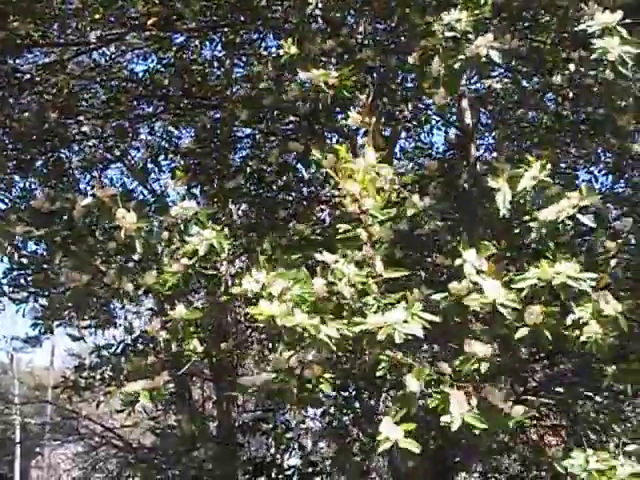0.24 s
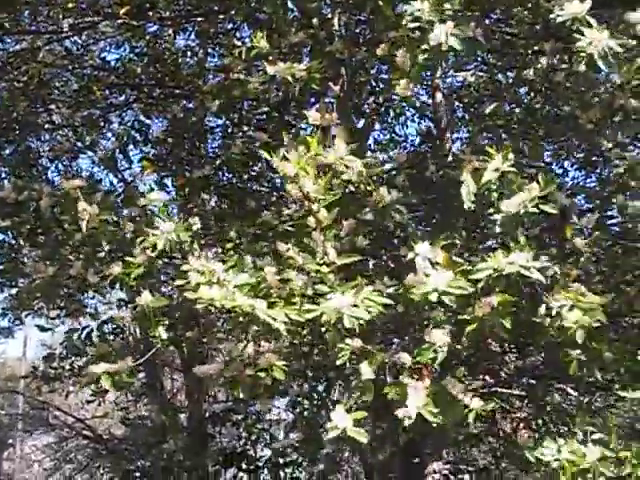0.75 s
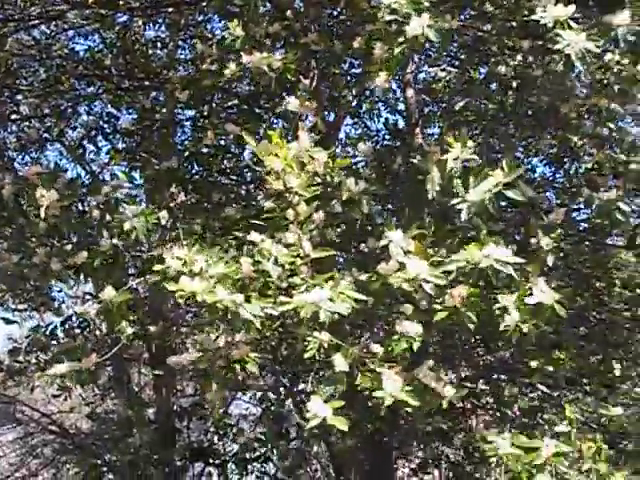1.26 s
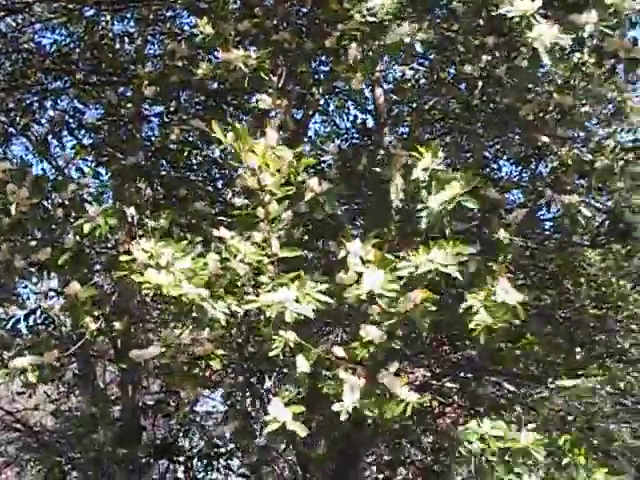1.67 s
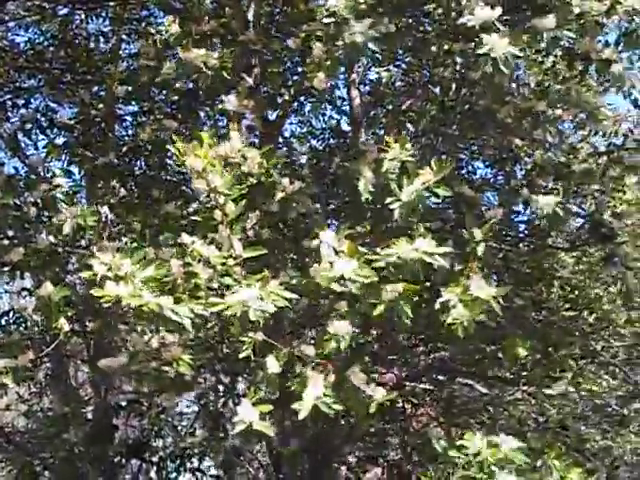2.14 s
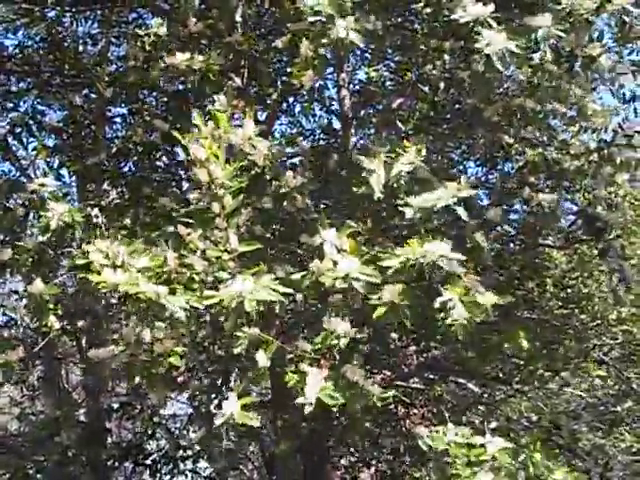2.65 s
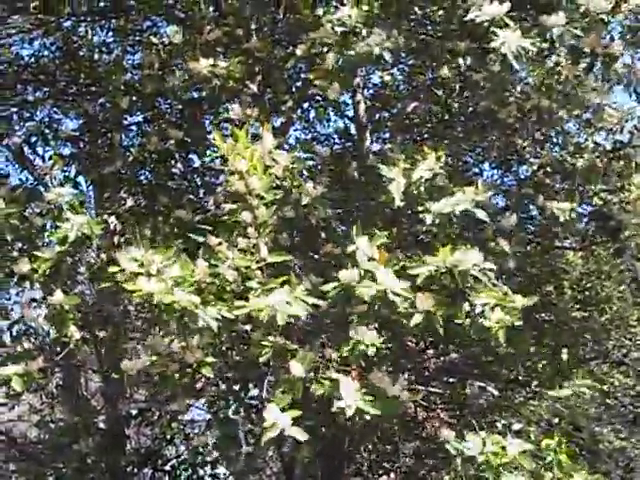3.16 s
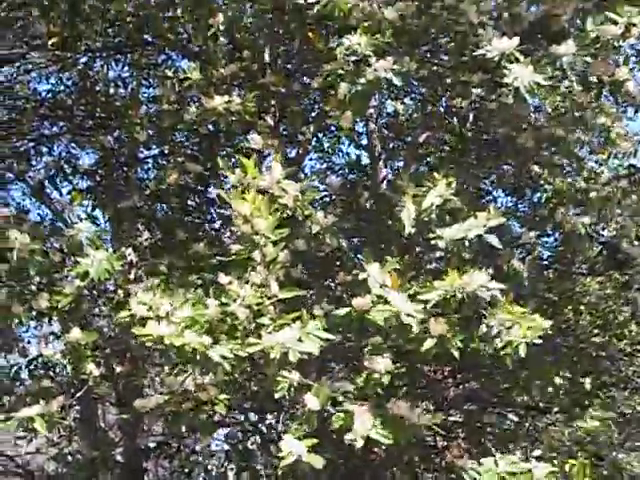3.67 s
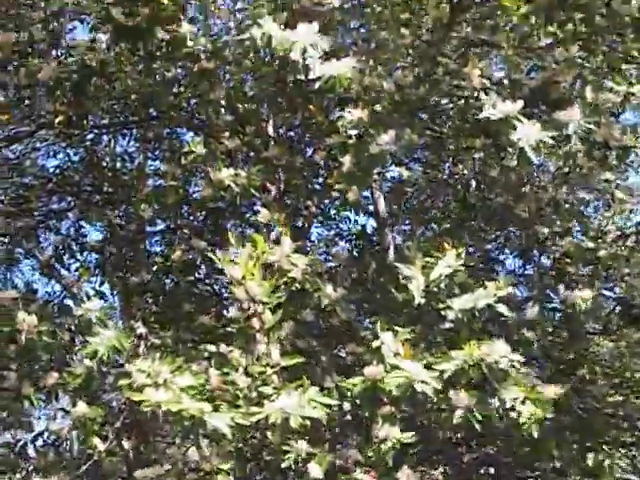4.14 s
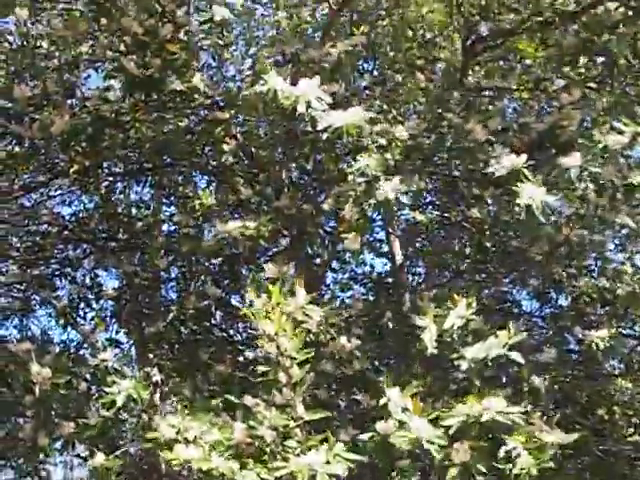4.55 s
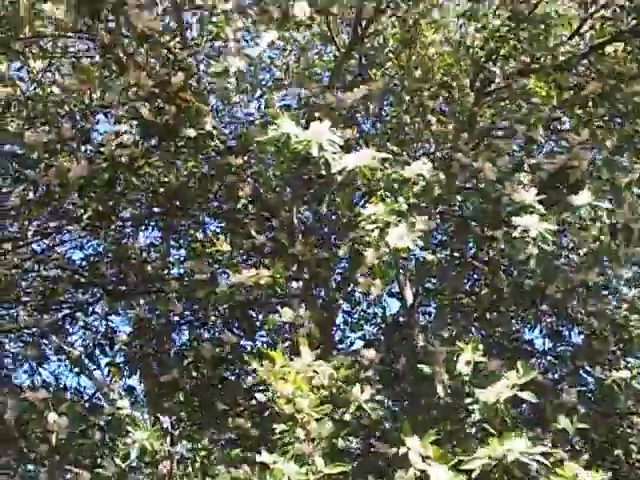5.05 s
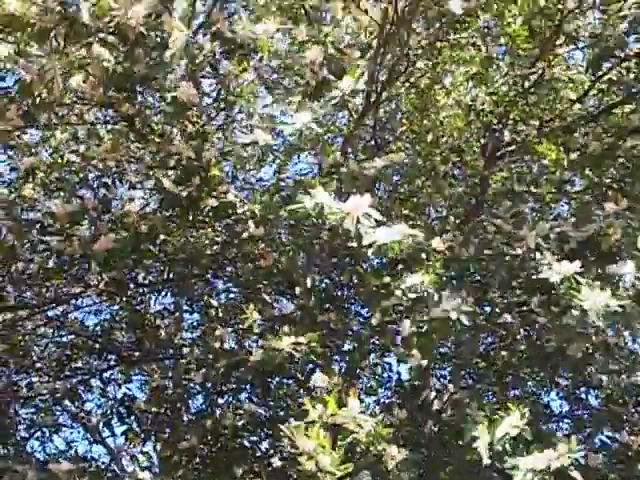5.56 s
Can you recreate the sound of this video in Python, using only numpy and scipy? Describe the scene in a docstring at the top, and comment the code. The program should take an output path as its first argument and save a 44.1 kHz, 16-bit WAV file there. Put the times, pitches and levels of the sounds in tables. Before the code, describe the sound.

In a breezy yard with a blossoming tree, a deep smooth drone, probably a passing propeller plane, hums throughout and sinks very slowly. Wind slaps the camera microphone hard just before one second, again around three, then in crowded thumps from about four seconds, with rumble, tearing and brief overload crackles. Small sharp plastic ticks from the camera body come at about three and a half seconds. A faint hiss lies behind.

```python
"""A yard with a blossoming tree on a breezy day, heard from one microphone on a camera. A low drone, probably
a propeller plane passing over, sinks slowly in pitch: a sine and three overtones. Gusts buffet the microphone:
short pressure swings with bands of torn noise and rumble around them, and thin crackles of overload.
The camera's plastic body ticks as struck resonances. Behind lies the fine hiss of leaves, insects and
microphone, as coloured noise."""
import sys
import numpy as np
from scipy import signal
from scipy.fft import rfft, irfft
from scipy.io import wavfile
from scipy.ndimage import uniform_filter1d

SR = 44100
rng = np.random.default_rng(int(sys.argv[2]) if len(sys.argv) > 2 else 0)


def pcm_store(signal):
    """Save signal as 16-bit PCM."""
    levels = np.round(np.clip(np.atleast_2d(signal), -1, 1) * 32767)
    wavfile.write(sys.argv[1], SR, levels.astype(np.int16).T)


N = 255780


def amp(db):
    """Decibels to gain."""
    return 10 ** (np.asarray(db) / 20)


def unit(x):
    """Scaled to rms 1."""
    return x / np.sqrt(np.mean(x ** 2) + 1e-20)


def in_time(rows):
    """Columns of a curve table after its seconds, each interpolated to one value per sample."""
    seconds, *columns = np.transpose(rows)
    return [np.interp(np.arange(N) / SR, seconds, column) for column in columns]


def band(low_hz, high_hz, order=2):
    """Band of fresh noise, rms 1; an extra second lets the filter settle."""
    sos = signal.butter(order, [low_hz, high_hz], "band", fs=SR, output="sos")
    return unit(signal.sosfilt(sos, rng.standard_normal(N + SR))[SR:])


def drift(rate_hz):
    """Slow random wandering of rms 1: noise through two equal one-pole lowpasses."""
    r = np.exp(-2 * np.pi * rate_hz / SR)
    wander = signal.lfilter([1], [1, -2 * r, r * r], rng.standard_normal(N + SR))
    return unit(wander[SR:])


# The plane's fundamental at the microphone. Each row: time in seconds, rms level in dB before a faint flutter.
FUNDAMENTAL_LEVEL = [(0, -22), (0.12, -20.5), (0.5, -21.5), (0.7, -19), (0.9, -29), (1.1, -25), (1.6, -17),
                     (1.9, -14.5), (2.25, -18), (2.9, -13), (3.1, -18), (3.3, -15), (3.65, -19.5),
                     (3.9, -18), (4.1, -24), (4.3, -19), (4.5, -22), (4.9, -14.5), (5.1, -14), (5.8, -16.5)]
# Its overtones, swelling on their own with the air between plane and microphone.
# Each row: time in seconds, then the rms levels of the 2nd, 3rd and 4th harmonic in dB before their flutter.
OVERTONE_LEVELS = [(0, -47, -49.5, -59), (.4, -56, -50, -66.5), (.7, -47, -65, -56.5),
                   (1.1, -50.5, -51.5, -62), (1.4, -45.5, -53, -60), (1.9, -42, -44, -52.5),
                   (2.2, -36.5, -55, -50.5), (2.5, -33, -53, -58), (3.1, -32, -58, -51),
                   (3.45, -43, -54, -55), (3.65, -40, -42, -56), (3.8, -39, -48, -60),
                   (4.0, -31.5, -52, -49), (4.3, -45, -48.5, -60), (5.1, -32.5, -51.5, -55),
                   (5.8, -33.5, -49, -60.5)]
BLADE_START_HZ, BLADE_SAG_HZ_PER_S = 119.5, 2.13   # the blade rate sinks evenly as the plane passes


def drone():
    """Clean blade tone and three overtones; moving air makes their phase and levels flutter a little."""
    blade_hz = BLADE_START_HZ - BLADE_SAG_HZ_PER_S * np.arange(N) / SR
    phase = 2 * np.pi * np.cumsum(blade_hz) / SR + 0.041 * drift(17.0)
    levels_db = [in_time(FUNDAMENTAL_LEVEL)[0] + 0.5 * drift(9)]
    levels_db += [db + 1.5 * drift(7) for db in in_time(OVERTONE_LEVELS)]
    out = np.zeros(N)
    for k, db in enumerate(levels_db):
        out += np.sqrt(2) * amp(db) * np.sin((k + 1) * phase + k)
    return out


# Strong eddies that thump the microphone port. Each row: centre in seconds, height of the bell in dB,
# pitch in Hz.
STRONG_EDDIES = [(0.75, -16, 250), (0.7758, -19, 250), (0.7958, -28.5, 320), (0.832, -13, 334),
                 (0.851, -9, 385), (0.871, -19.5, 450), (0.8976, -11, 232), (0.9126, 1.5, 284),
                 (0.9814, -18.5, 278), (1.0056, -12, 174), (2.9769, -15, 227), (3.0194, -6, 360),
                 (3.0402, 0.5, 503), (3.0521, -5, 265), (3.0673, -8.5, 320), (3.1388, -14.5, 170),
                 (3.2315, -16, 200), (3.6588, -18, 169), (3.6779, -19, 410), (3.6925, -9.5, 416),
                 (3.7215, -4.5, 236), (3.7961, -13, 317), (3.9565, -10.5, 168), (4.035, -16, 234),
                 (4.0578, -10.5, 244), (4.1099, -22, 252), (4.1576, -3, 245), (4.214, -11, 222),
                 (4.2733, -19, 167), (4.3686, -17, 170), (4.4, -12.5, 272), (4.441, -13, 226),
                 (4.5498, -9, 263), (4.568, -11.5, 350), (4.5797, -9, 440), (4.6038, -12, 310),
                 (4.6141, -2, 285), (4.6276, 0.3, 308), (4.6441, -8.5, 428), (4.6672, -12.5, 480),
                 (4.6961, -6, 232), (4.71, -9, 316), (4.7252, -3.5, 257), (4.739, -8.5, 343),
                 (4.7737, -7.5, 347), (4.8003, -14.5, 390), (4.8542, -12.5, 266), (5.041, -14.5, 175),
                 (5.1312, -4.5, 170), (5.139, -12.5, 380), (5.1638, -12, 253), (5.2029, -18.5, 398),
                 (5.2562, -17, 170), (5.3421, -5, 243), (5.6009, -16.5, 230), (5.6302, -7.5, 292),
                 (5.6874, -21.5, 282)]
# Gusts at the port. Each row: start in seconds, hold in seconds, tearing in dB (nominal, near 170 Hz),
# brightness in dB (420 Hz against 170 Hz), deep rumble in dB before its flutter.
PORT_GUSTS = [(0.505, 0.017, -54, -7, -28), (0.76, 0.047, -24, -11.5, -23), (0.82, 0.042, -27, -4.5, -15.5),
              (0.906, 0.016, -22, -7, -21), (0.983, 0.022, -35.5, -11.5, -21), (1.323, 0.017, -49, -6, -23),
              (1.574, .05, -52, -4, -31), (1.77, 0.016, -42, -16, -34), (2.202, 0.022, -38, -16, -32),
              (2.363, .02, -49.5, -3, -29), (2.455, 0.025, -46.5, -7, -26),
              (2.595, 0.023, -47.5, -6.5, -24.5), (2.81, .1, -47, -10.5, -38), (3.013, 0.039, -21, -5, -16),
              (3.11, 0.3, -40, -15, -34), (3.267, .02, -45, -11.5, -18.5), (3.45, .02, -50, -12, -29.5),
              (3.662, 0.058, -29, -9, -25), (3.743, 0.046, -33.5, -14.5, -23),
              (3.844, .03, -38.5, -16.5, -24), (3.918, .03, -35.5, -23, -19),
              (4.018, 0.17, -32.5, -24, -19), (4.212, 0.093, -34.5, -21.5, -23.5),
              (4.385, 0.084, -31, -20.5, -20), (4.561, .03, -22, -9.5, -25), (4.587, .045, -16, -5, -13.5),
              (4.649, .07, -18.5, -11, -13), (4.73, .08, -26, -8, -16.5), (4.897, .15, -38.5, -22, -27.5),
              (5.107, 0.063, -28.5, -14.5, -22.5), (5.194, 0.064, -29.5, -13.5, -16.5),
              (5.327, 0.032, -22.5, -19, -23), (5.616, 0.037, -22.5, -15, -20),
              (5.692, 0.13, -37, -13, -26)]
TEAR_RISE_DB_S, TEAR_FALL_DB_S, TEAR_CALM_DB = 453, 349, -53
DEEP_RISE_DB_S, DEEP_FALL_DB_S, DEEP_CALM_DB = 199, 179.5, -46.5   # the rumble is slower


def gusts():
    """Wind on the port: the gust rows drive tearing, brightness, rumble and the lesser eddies."""
    tear, bright, deep = np.transpose(PORT_GUSTS)[2:]
    tear_db, which = gust_level(tear, TEAR_RISE_DB_S, TEAR_FALL_DB_S, TEAR_CALM_DB)
    deep_db, _ = gust_level(deep, DEEP_RISE_DB_S, DEEP_FALL_DB_S, DEEP_CALM_DB)
    bright_db = uniform_filter1d(bright[which], size=800)
    eddies = thumps(STRONG_EDDIES) + thumps(small_eddies(tear_db))
    return eddies + wind(eddies, tear_db, bright_db, deep_db)


def gust_level(peak_db, rise_db_s, fall_db_s, calm_db):
    """Each gust rises, holds and falls; returns the loudest level in dB and which gust has it."""
    start, hold = np.transpose(PORT_GUSTS)[:2, :, None]
    t = np.arange(N) / SR
    before = rise_db_s * np.maximum(start - t, 0)
    after = fall_db_s * np.maximum(t - start - hold, 0)
    each = peak_db[:, None] - before - after
    return np.maximum(each.max(axis=0), calm_db), each.argmax(axis=0)


def thumps(rows, cycles=0.54, shape=1.32):
    """Each eddy is a swing or two of pressure under a pointed bell, at a random phase."""
    out, t = np.zeros(N), np.arange(-512, 512) / SR
    turns = rng.uniform(0, 2 * np.pi, len(rows))
    for (s, db, hz), turn in zip(rows, turns):
        i = round(s * SR) - 512
        bell = np.exp(-np.abs(t * hz / cycles) ** shape)
        out[i:i + 1024] += amp(db) * bell * np.cos(2 * np.pi * hz * t + turn)
        # a fainter, sharper edge at the centre of the swing
        edge = np.exp(-np.abs(t * hz / 0.1) ** 0.85)
        out[i:i + 1024] += amp(db - 20.5) * edge * np.cos(2 * np.pi * 0.45 * hz * t + 2 * turn)
    return out


SMALL_PER_S, SMALL_OVER_TEAR_DB, SMALL_TOP_DB = 35.0, 13.5, -13
SMALL_LOW_HZ, SMALL_HIGH_HZ = 178, 308


def small_eddies(tear_db):
    """Lesser eddies at random times, following the gust of the moment; rows as for the strong ones."""
    when, size, pitch = rng.random((int(SMALL_PER_S * N / SR), 3)).T
    s = 0.02 + when * (N / SR - 0.04)   # clear of both ends
    top_db = np.minimum(tear_db[(s * SR).astype(int)] + SMALL_OVER_TEAR_DB, SMALL_TOP_DB)
    hz = SMALL_LOW_HZ * (SMALL_HIGH_HZ / SMALL_LOW_HZ) ** (pitch ** 2)   # the low pitches are commoner
    return list(zip(s, top_db - 6 * size, hz))


def wind(eddies, tear_db, bright_db, deep_db):
    """Lumpy noise: a deep rumble, and tearing that bunches around the eddies and slopes off to the treble."""
    near = uniform_filter1d(eddies ** 2, 400)
    bunching = (near + 1e-5) / (uniform_filter1d(near, 3000) + 1e-5)   # high on an eddy, low between
    lumps = bunching ** 0.3 * amp(2.1 * drift(60))
    out = amp(deep_db + 3 * drift(14)) * band(21, 84, order=3)
    for hz in 100 * 2 ** np.arange(0, 3.5, 0.5):
        steps = np.log2(hz / 170) / np.log2(420 / 170)   # 0 at 170 Hz, 1 at 420 Hz
        slope_db = np.minimum(bright_db, 0) * steps - 14 * max(steps - 1, 0) ** 2
        out += lumps * amp(tear_db + slope_db) * band(hz / 2 ** 0.24, hz * 2 ** 0.28, order=3)
    return out


# Thin crackles of the recorder overloading on the tallest wind swings.
# Each row: start in seconds, peak in dB.
OVERLOAD_CRACKLES = [(.9135, -28), (4.615, -24), (4.6245, -33), (4.7252, -24), (5.2012, -24)]


def overload_crackles():
    """Thin crackles of the recorder overloading: an impulse through a band from 500 to 2000 Hz."""
    s, db = np.transpose(OVERLOAD_CRACKLES)
    sos = signal.butter(2, [500, 2000], "band", fs=SR, output="sos")
    crackle = signal.sosfilt(sos, np.eye(1, 256)[0])
    at = np.round(s * SR).astype(int)[:, None] + np.arange(256)
    out = np.zeros(N)
    out[at] = amp(db)[:, None] * crackle / crackle.max()
    return out


# Ticks of the camera body, right at the microphone. Each row: start in seconds, relative strength in dB,
# brightness in dB per octave above 2800 Hz.
BODY_TICKS = [(0.3318, -26.5, -22), (1.0673, -27, -7), (1.562, -16, -4.5), (2.95, -30.5, -11),
              (3.5082, -4, -3.5), (3.513, -19, -10), (3.52, -18, -11), (3.5273, -24, -16), (3.5738, -7, -3),
              (3.6434, -10.5, -5.5)]
# Modes of the plastic body. Each row: pitch in Hz, relative strength in dB, 60 dB decay time in seconds.
BODY_MODES = [(2043, -2.5, 0.011), (2750, 3.5, 0.0096), (3420, -1.5, 0.01), (3780, -0.5, 0.0086),
              (4906, 7, 0.0047), (5800, -19.5, 0.0052)]


def ticks():
    """A short ragged snap strikes every mode of the body, the high ones by the tick's own brightness."""
    s, strength_db, bright_db = np.transpose(BODY_TICKS)
    ragged = 0.39 * rng.standard_normal((len(s), 128)) * np.exp(-np.arange(128) / 66.0)
    ragged[:, 0] = 5.47   # one hard contact, then a scuff
    at = np.round(s * SR).astype(int)[:, None] + np.arange(128)
    out = np.zeros(N)
    for k, (hz, db, t60) in enumerate(BODY_MODES):
        snap_db = strength_db + db - 16 + bright_db * max(np.log2(hz / 2800), 0)
        snaps = np.full(N, 1e-18)
        snaps[at] += amp(snap_db)[:, None] * ragged
        r, w = amp(-60 / (t60 * SR)), 2 * np.pi * hz / SR
        ring = signal.lfilter([0, np.sin(w)], [1, -2 * r * np.cos(w), r * r], snaps)
        out += (-1) ** k * ring
    treble = signal.sosfilt(signal.butter(4, 1800, "high", fs=SR, output="sos"), out)
    return 0.093 * out + treble   # little is left below 1800 Hz


# Colour of the yard's hiss at the microphone. Each row: frequency in Hz, relative density in dB.
HISS_COLOUR = [(60, 11.5), (200, 8.5), (500, 4), (900, 3.5), (1500, -2.5), (2000, -1), (2700, 2.5),
               (3500, 2), (5500, 5), (5900, -3), (6400, -21)]
# Its loudness. Each row: time in seconds, rms level in dB before a faint flutter.
HISS_LOUDNESS = [(0, -41), (3.2, -40.5), (3.9, -39), (4.7, -40.5), (5.8, -41)]


def hiss():
    """Smooth noise coloured by leaves, insects and microphone, breathing faintly."""
    hz = np.fft.rfftfreq(N, 1 / SR) + 1
    point_hz, point_db = np.transpose(HISS_COLOUR)
    colour = amp(np.interp(np.log(hz), np.log(point_hz), point_db)) * (hz > 30)
    noise = unit(irfft(rfft(rng.standard_normal(N)) * colour, N))
    return amp(in_time(HISS_LOUDNESS)[0] + 0.83 * drift(12)) * noise


LEFT_LAG_S = 3.73 / SR


def scene():
    """All layers are summed to one signal that feeds both channels; the left lags by a phase slope."""
    mono = drone() + gusts() + overload_crackles() + ticks() + hiss()
    padded = np.pad(mono, 256, mode="reflect")   # keeps the lag from wrapping round the ends
    lag = np.exp(-2j * np.pi * np.fft.rfftfreq(len(padded), 1 / SR) * LEFT_LAG_S)
    late = irfft(rfft(padded) * lag, len(padded))
    return np.array([late[256:-256], mono])


CUTOFF_HZ = 6900   # 70 dB down from here up


def record(dry, knee_db=-4.0, release_db_s=95.5):
    """A limiter keyed by the right channel's lows ducks and recovers; peaks clip; the top is cut."""
    bass = signal.lfilter([0.1], [1, -0.9], dry[1])
    over_db = np.maximum(20 * np.log10(np.abs(bass) + 1e-9) - knee_db, 0)
    # holds each peak, then lets it fall at a steady rate
    fall = release_db_s * np.arange(N) / SR
    held_db = np.maximum.accumulate(over_db + fall) - fall
    duck_db = signal.lfilter([0.01], [1, -0.99], held_db)
    level = np.clip(dry * amp(-0.7 * duck_db), -0.96, 0.96)   # the converter overloads on the tallest swings
    cut = signal.sosfilt(signal.cheby2(22, 70, CUTOFF_HZ, fs=SR, output="sos"), level)
    return np.clip(cut, -1, 1)


dry = scene()
out = record(dry)
pcm_store(out)
```